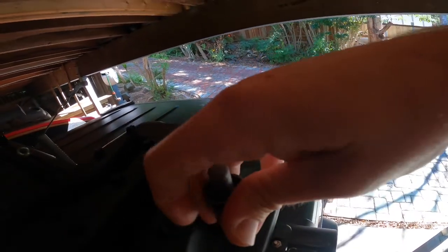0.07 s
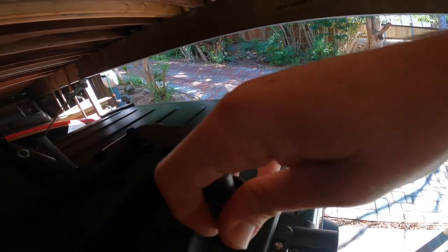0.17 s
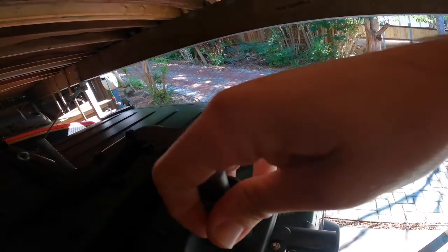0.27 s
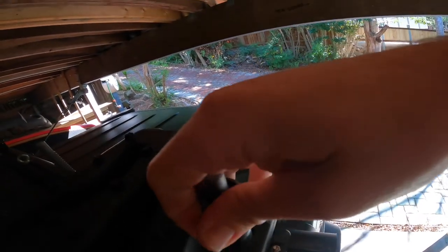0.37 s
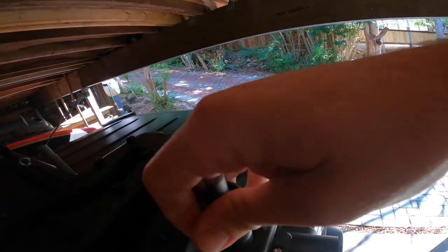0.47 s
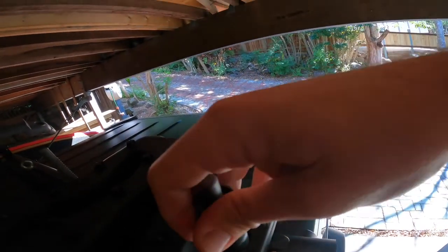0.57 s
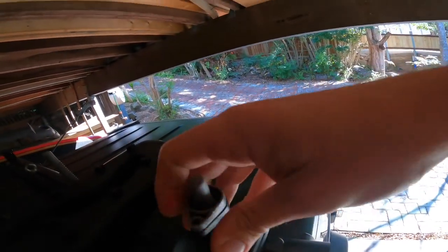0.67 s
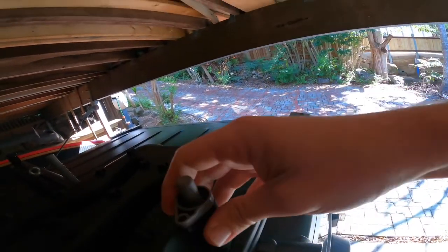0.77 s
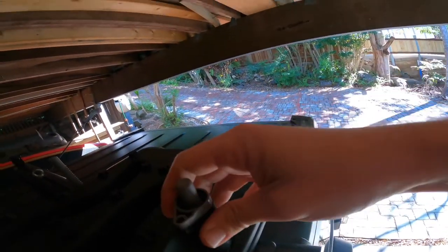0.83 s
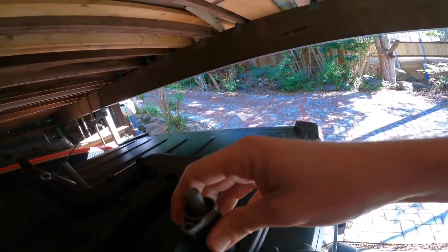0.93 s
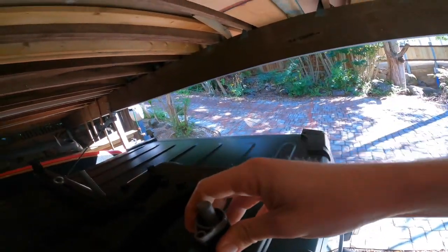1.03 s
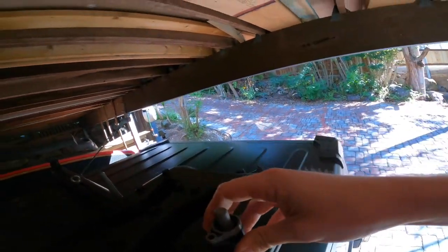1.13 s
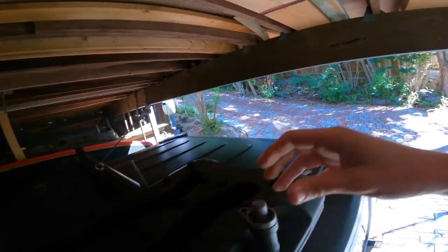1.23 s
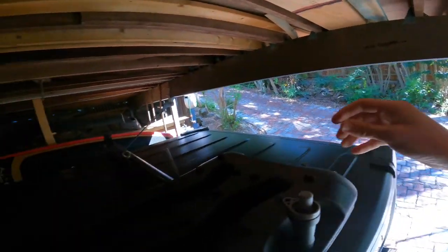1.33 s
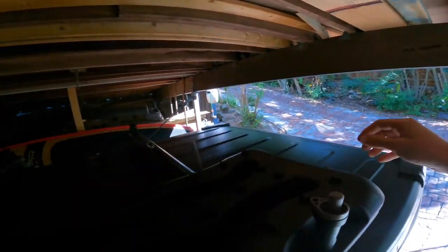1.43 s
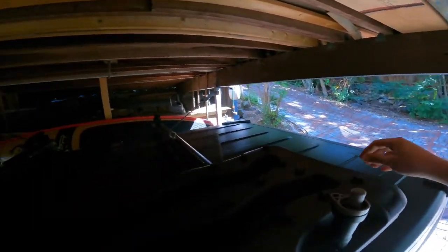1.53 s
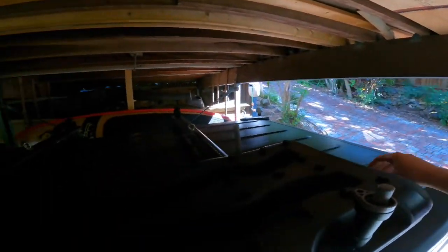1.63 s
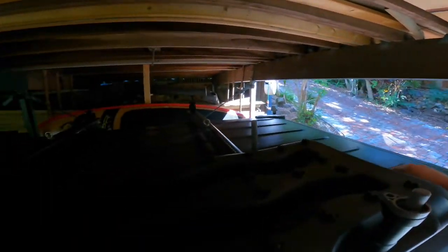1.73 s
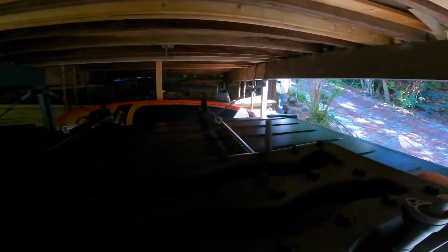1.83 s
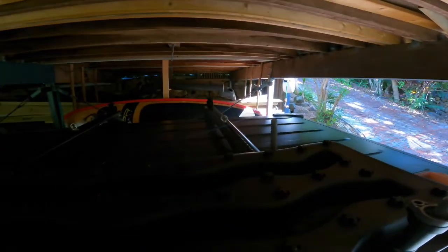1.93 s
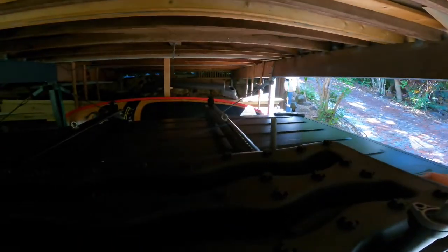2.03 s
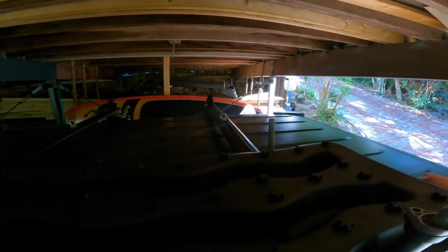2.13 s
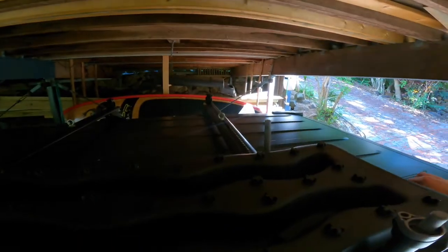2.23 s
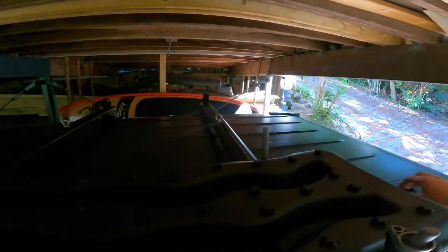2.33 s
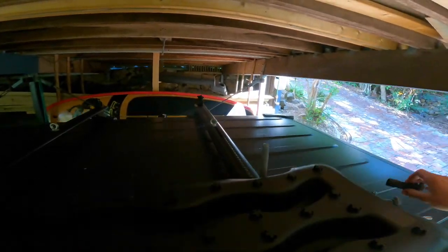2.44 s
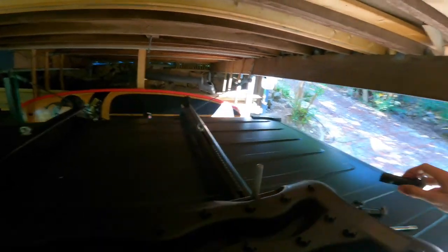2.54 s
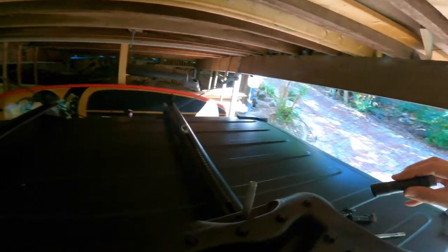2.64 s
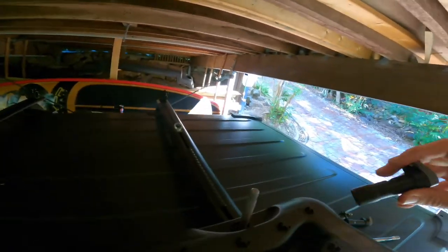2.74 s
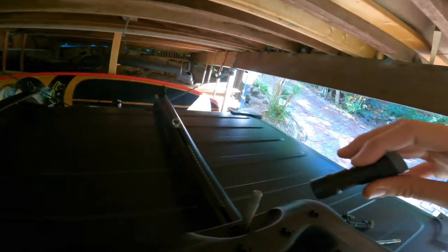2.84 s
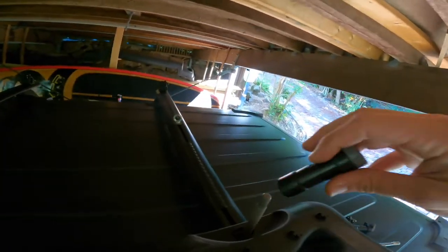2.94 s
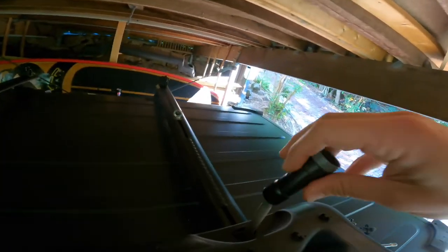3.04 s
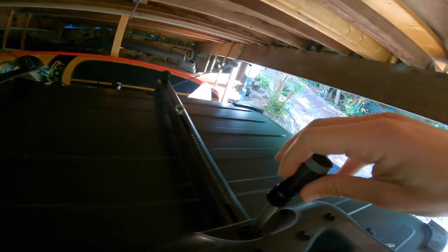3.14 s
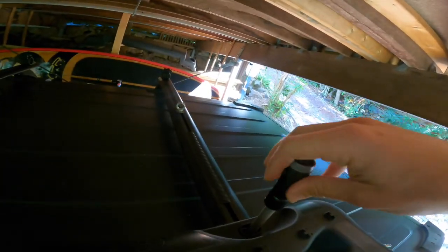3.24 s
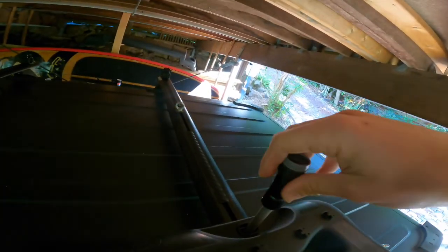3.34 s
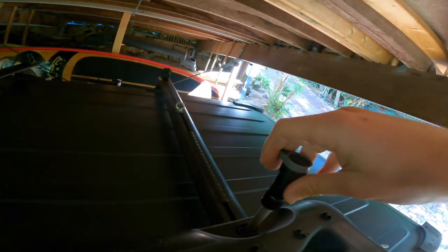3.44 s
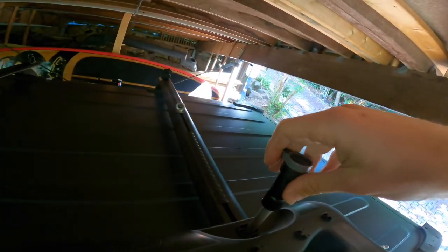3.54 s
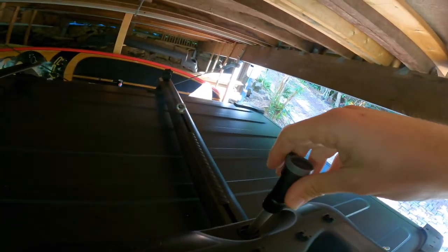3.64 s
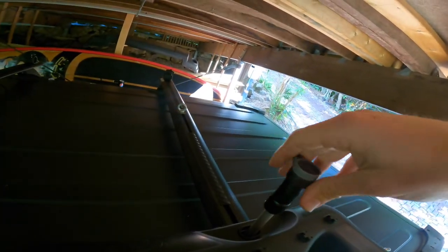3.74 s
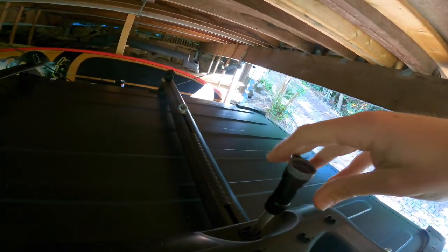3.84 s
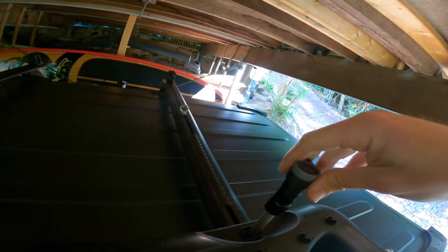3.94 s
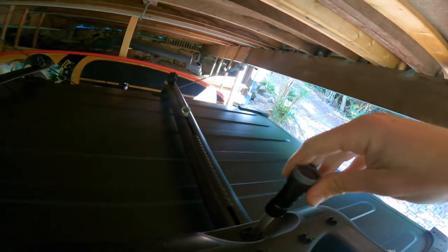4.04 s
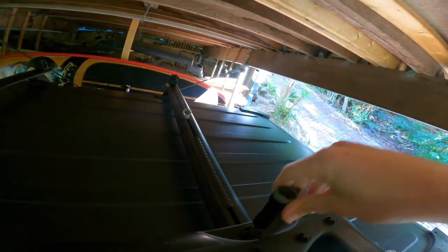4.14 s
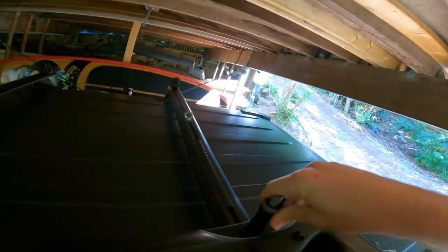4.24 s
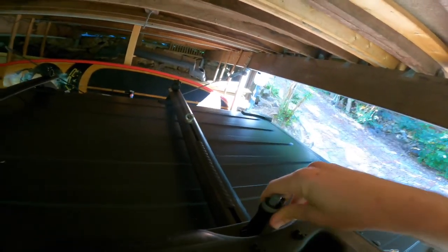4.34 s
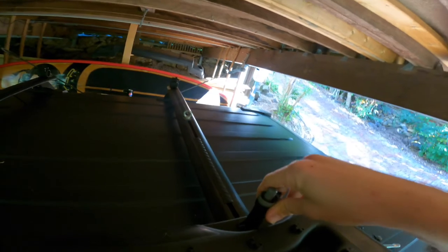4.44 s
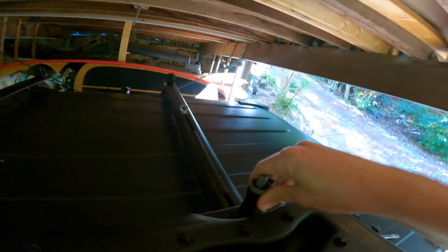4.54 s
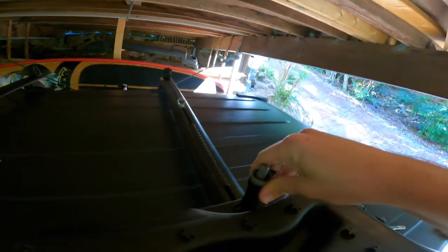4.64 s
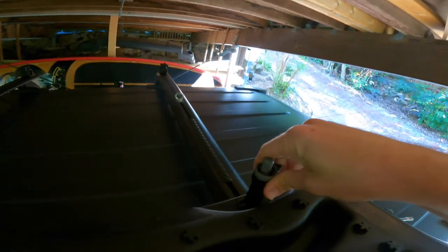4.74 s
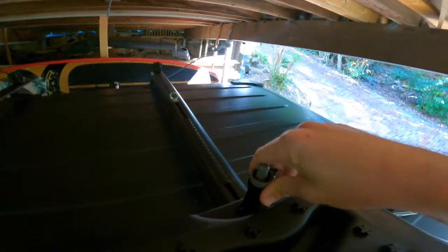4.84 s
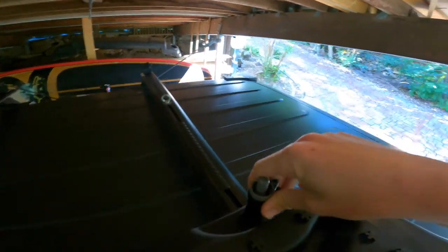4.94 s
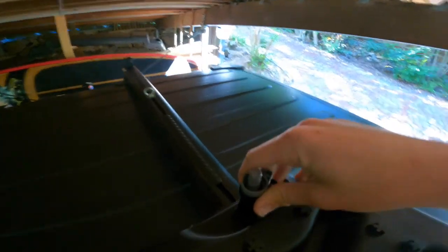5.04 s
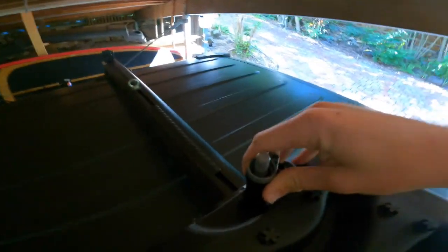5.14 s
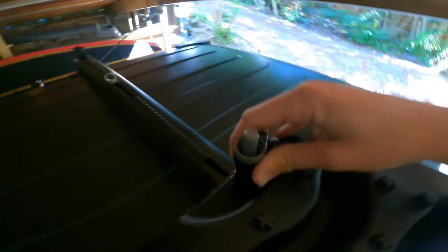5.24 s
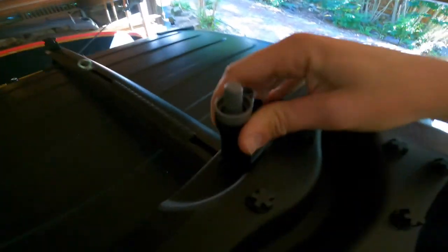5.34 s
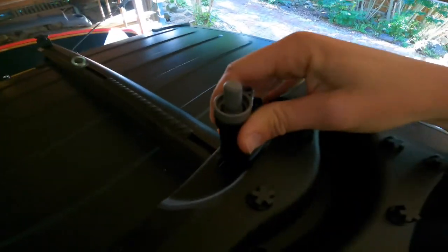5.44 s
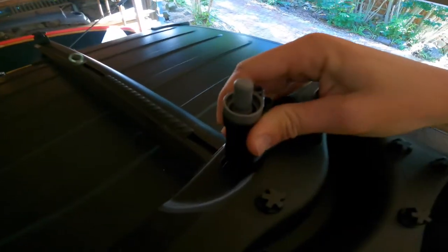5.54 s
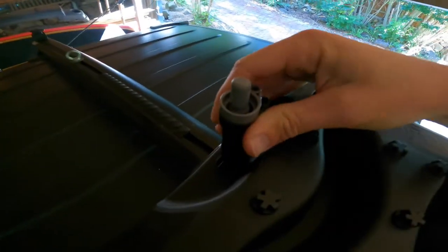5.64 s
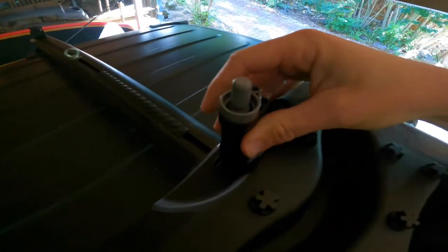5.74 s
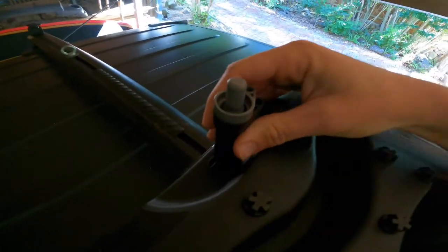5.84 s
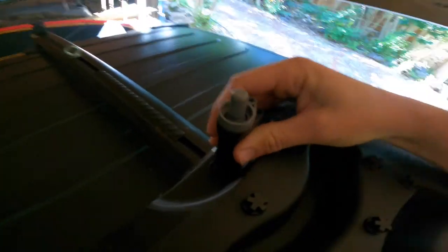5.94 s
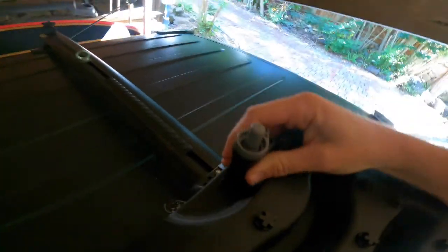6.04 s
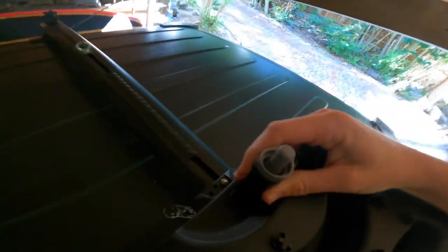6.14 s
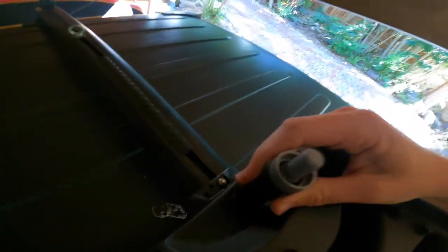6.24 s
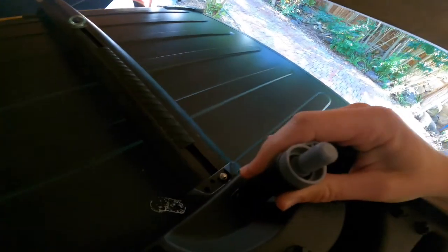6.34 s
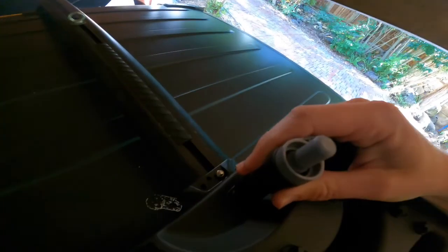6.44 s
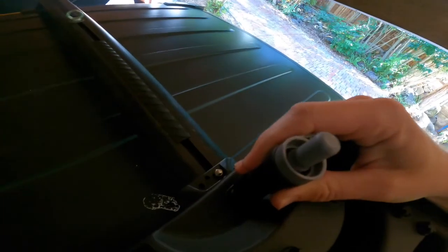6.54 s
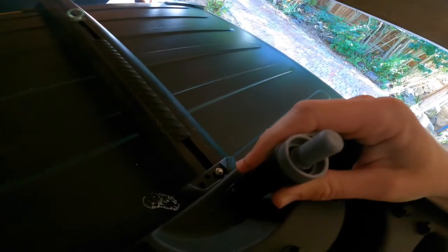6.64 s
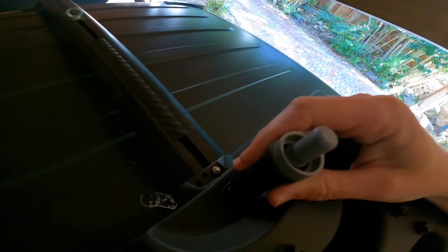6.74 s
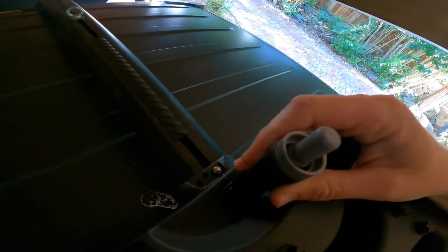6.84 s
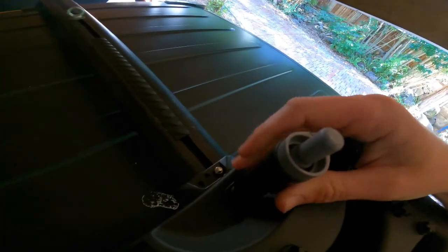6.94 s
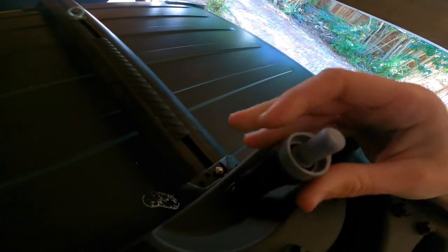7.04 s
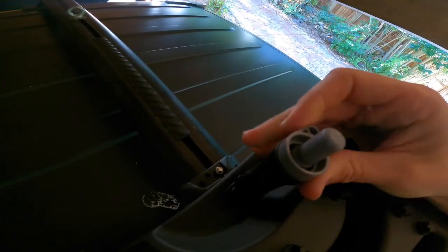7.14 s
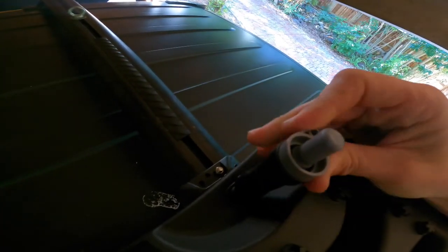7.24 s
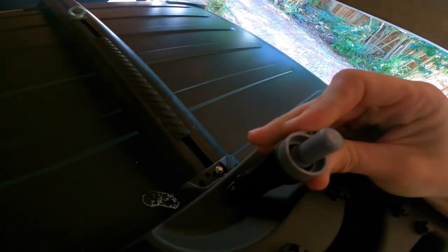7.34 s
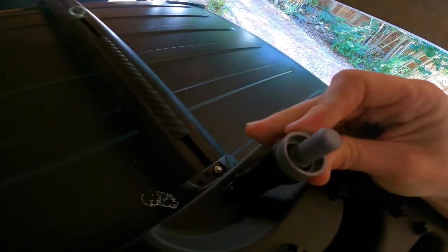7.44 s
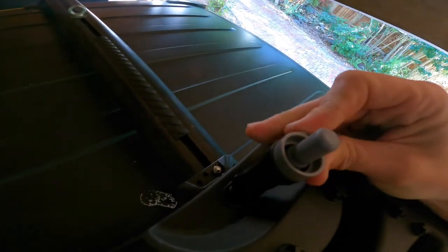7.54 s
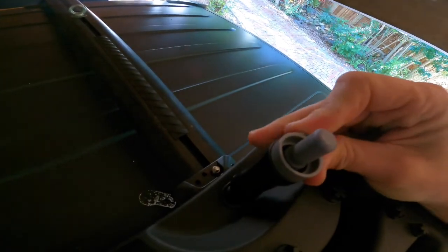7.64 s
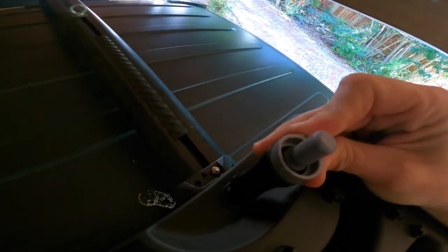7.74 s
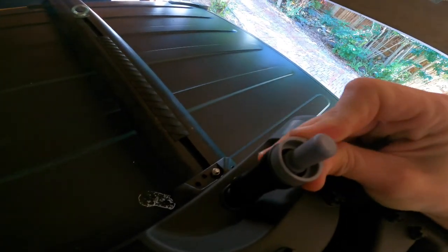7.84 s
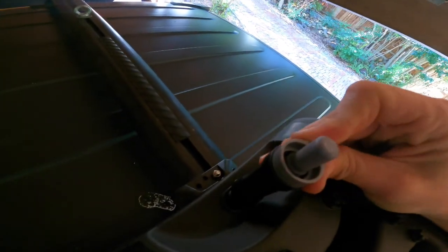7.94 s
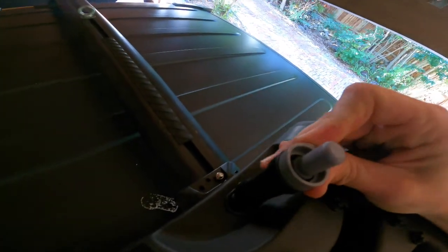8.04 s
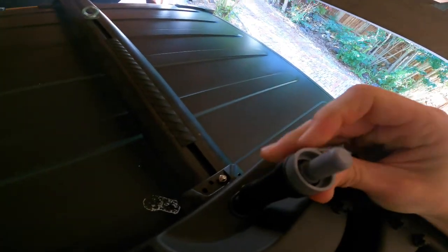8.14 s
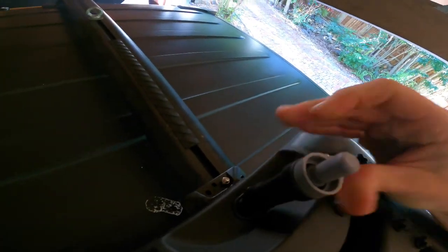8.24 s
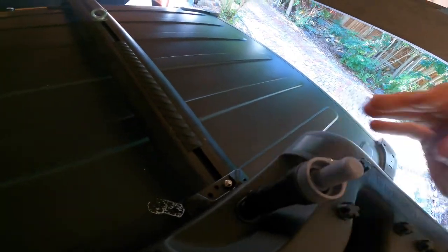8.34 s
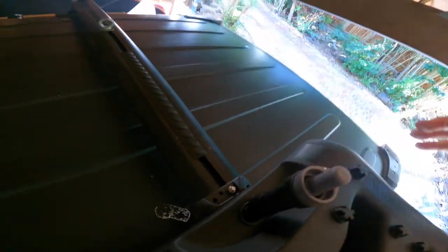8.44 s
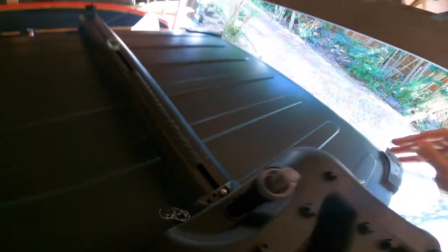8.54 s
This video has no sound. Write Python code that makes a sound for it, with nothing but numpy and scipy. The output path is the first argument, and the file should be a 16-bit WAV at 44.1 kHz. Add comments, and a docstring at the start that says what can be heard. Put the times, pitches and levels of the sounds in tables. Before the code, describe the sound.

Close hand work on a big plastic panel: small clicks, hollow thuds, a fast ribbed zip, then soft rubs and taps above distant engine hum.

```python
"""Plastic pins click and thump into a large moulded lid inside an open wooden shed, close to the microphone.
Each blow rings the lid in several bands, heavy ones also bend it; a ribbed pin ratchets down its hole.
Short creaks, rings and low thumps are swelling tones; rubbing fingers and plastic are uneven noise grains.
Behind them, air and traffic rumble as low noise and a far engine hums as two wavering tones.
The stereo picture closes almost to the middle around 3.5 s and opens partly at the very end."""
import sys
import numpy as np
from scipy import signal
from scipy.fft import rfft, irfft, next_fast_len
from scipy.io import wavfile

SR = 44100
rng = np.random.default_rng(int(sys.argv[2]) if len(sys.argv) > 2 else 0)


def bounce(signal):
    """Save signal as a 16-bit WAV file at the path given by the first command-line argument."""
    frames = np.transpose(np.atleast_2d(signal))
    limited = np.clip(frames, -1, 1)
    pcm = np.round(limited * 32767).astype(np.int16)
    wavfile.write(sys.argv[1], SR, pcm)


N = 379298

# ways the lid and pin ring, from low to high: (f/Hz, level/dB, time to fall 60 dB/s)
THUMP = [(67, -5.5, 0.19), (99, 1.5, 0.046), (169.3, -4, 0.1), (211.7, -3, 0.084), (279.6, -6, 0.027)]
BODY = [(334, -8, 0.16), (424, -8, 0.079), (443, 0.5, 0.025), (502, -5.5, 0.057), (548, -8.5, 0.053),
        (679, -3, 0.031), (779, -5, 0.05), (893, 0, 0.016)]
KNOCK = [(1026, -6, 0.058), (1166, -4.5, 0.033), (1327, -1.5, 0.021), (1576, -1, 0.016),
         (1724, -7.5, 0.055), (1876, -0.5, 0.017), (2153, -3.5, 0.017)]
CLICK = [(2390, -1, 0.0062), (3160, 6.5, 0.0023), (3780, -0.5, 0.0073), (4244, -0.5, .007),
         (4705, 8.5, 0.0022), (5354, 5, 0.003), (6500, -5.5, 0.0029), (7450, -6.5, 0.0037),
         (8850, -11.5, .004), (10050, -15.5, 0.0034), (12200, -21, 0.0028)]
# rumble of air and traffic: (t/s, level/dB)
RUMBLE = [(0.0, -36.5), (0.35, -45.5), (1.0, -40.5), (1.7, -43.5), (2.2, -39.5), (3.4, -40), (3.9, -40),
          (4.29, -39.5), (4.69, -45.5), (5.3, -41), (5.55, -44), (6.0, -40.5), (6.23, -36), (6.45, -38.5),
          (7.02, -41), (8.3, -37.5), (8.48, -40.5), (8.6, -34)]
# its tone colour: (f/Hz, level/dB)
RUMBLE_COLOUR = [(8.8, -33), (30, -7.5), (44, 5.5), (70, 0), (166, -7.5), (400, -22.5), (520, -48),
                 (880, -120)]

THUMP_COLOUR_HZ = 200
# the ribbed pin catches once, then its ribs run past the rim
CATCH_S, RUN_S = 4.141, 4.1696
RIB_CLICK_DB, RIB_BODY_DB = -20, -16.5


def amp(db):
    """Turn dB into a gain."""
    return 10 ** (np.asarray(db) / 20)


def rms_one(x):
    """Scale a signal to an rms of 1."""
    return x / np.sqrt(np.mean(x ** 2) + 1e-20)


def in_time(rows):
    """Turn table columns into curves with one value a sample."""
    s, *columns = np.transpose(rows)
    return [np.interp(np.arange(N) / SR, s, c) for c in columns]


def coloured(x, spectrum):
    """Filter a signal by a table of (f/Hz, level/dB), joined along a log pitch scale."""
    size = next_fast_len(N)
    hz, db = np.transpose(spectrum)
    log_hz = np.log(np.arange(size // 2 + 1) * SR / size + 1)
    gain = amp(np.interp(log_hz, np.log(hz), db))
    return irfft(rfft(x, size) * gain, size)[:N]


def drift(rate):
    """Wander randomly with rms 1, choosing about rate new values a second."""
    knots = int(N / SR * rate) + 2
    return rms_one(np.interp(np.linspace(0, knots - 1, N), np.arange(knots), rng.standard_normal(knots)))


def swell(start, end, level_db, rise_db, fall_db):
    """Level in dB that climbs to a hold and falls away, slopes in dB per second."""
    t = np.arange(N) / SR
    return level_db - rise_db * np.maximum(start - t, 0) - fall_db * np.maximum(t - end, 0)


def near(modes, colour_hz, db_per_octave):
    """The spot struck favours the modes near its colour."""
    return -db_per_octave * np.abs(np.log2(np.array(modes)[:, :1] / colour_hz))


def ringing(modes, extra_db=0, stretch=1):
    """Sum the fading tones after one click; neighbours start in opposite directions."""
    hz, db, t60 = np.array(modes).T[:, :, None]
    t = np.arange(SR // 4) / SR
    sign = (-1) ** np.arange(len(modes))[:, None]
    level = amp(db + extra_db - 60 * t / t60)
    return np.sum(sign * level * np.sin(2 * np.pi * hz * stretch * t), axis=0)


def strike(force, modes, peak_db, extra_db=0, soft_hz=20000, detune=.01):
    """A force, rounded by a soft contact, rings the modes a little differently each time."""
    chance = rng.standard_normal((2, len(modes), 1))
    ring = ringing(modes, extra_db + 2.0 * chance[0], 1 + detune * chance[1])
    r = np.exp(-2 * np.pi * soft_hz / SR)
    soft_force = signal.lfilter([1], [1, -2 * r, r * r], force)
    sound = signal.fftconvolve(soft_force, ring)[:len(ring)]
    return amp(peak_db) * sound / np.max(np.abs(sound))


def add(out, sound, s):
    """Mix a sound in at time s."""
    i = round(s * SR)
    out[i:i + len(sound)] += sound[:N - i]


def yard():
    """Air and traffic are lumpy low noise; the engine is a firing tone and one at half its pitch."""
    # deepest swell of the rumble: (t/s, level/dB)
    deep = [(0.0, -45), (0.12, -34), (0.17, -42.5), (3.83, -60), (4.0, -43), (4.31, -31), (4.58, -54.5),
            (5.01, -49.5), (5.41, -30.5), (5.46, -46.5), (8.46, -54.5), (8.6, -48)]
    # its tone colour: (f/Hz, level/dB)
    deep_colour = [(10, -31.5), (20, -0.5), (32, 0.5), (45, -24.5), (80, -88)]
    # far engine: (t/s, firing f/Hz, firing level/dB, half-pitch level/dB), before small wavers
    engine = [(0, 142.1, -57, -63), (.6, 142.2, -54, -52), (1.9, 139.9, -51.5, -47.5),
              (2.4, 140.6, -71.5, -55), (5.4, 146.2, -60.5, -69), (6.4, 151.2, -51.5, -103),
              (7, 149.3, -47.5, -45), (7.6, 150.5, -42.5, -48.5), (8.1, 156.1, -43, -38.5),
              (8.6, 161.2, -63.5, -48.5)]
    rumble = rms_one(coloured(rng.standard_normal(N), RUMBLE_COLOUR)) * amp(in_time(RUMBLE)[0])
    rumble = rumble + rms_one(coloured(rng.standard_normal(N), deep_colour)) * amp(in_time(deep)[0])
    hz, firing_db, half_db = in_time(engine)
    turn = np.cumsum(2 * np.pi * hz * (1 + .004 * drift(8)) / SR)
    wobble_db = 1.5 * drift(5)   # raises one tone while it lowers the other
    firing = amp(firing_db + wobble_db) * np.sin(turn)
    half = amp(half_db - wobble_db) * np.sin(turn / 2)
    return rumble + np.sqrt(2) * (firing + half)


def shed(x):
    """Diffuse echoes of the timber roof, a fading noise tail duller than the direct sound."""
    t60_s, first_echo_s = 0.3, .006
    t = np.arange(SR // 2) / SR
    tail = rng.standard_normal(len(t)) * amp(-60 * t / t60_s) * (t > first_echo_s)
    tail = signal.lfilter([1], [1, -.5], tail)
    return signal.fftconvolve(x, tail / np.linalg.norm(tail))[:N]


def rubbing():
    """Fingers and plastic rub as dense uneven grains; the dull part is partly heard through the lid."""
    # rubs: (start t/s, length/s, dull level/dB, bright level/dB), before the grip wavers
    rubs = [(0.0, 0.0027, -41.5, -46), (0.463, 0.021, -55.5, -58.5), (0.724, 0.079, -56, -57),
            (0.888, 0.2, -56.5, -68), (1.25, 0.059, -54, -50.5), (1.614, 0.28, -72, -65),
            (2.115, 0.16, -49, -71), (2.459, 0.4, -59.5, -64.5), (2.973, 0.039, -50.5, -76),
            (3.18, 0.15, -43.5, -56.5), (3.322, 0.12, -49, -63), (3.311, 0.098, -38, -60),
            (3.683, 0.092, -52.5, -57.5), (3.965, 0.049, -42.5, -58), (4.17, 0.21, -44.5, -65),
            (4.888, 0.027, -48, -70), (5.018, 0.1, -50.5, -64), (5.135, 0.037, -41, -64),
            (5.224, 0.04, -44, -64), (5.292, 0.029, -53, -63), (5.374, 0.063, -46, -80),
            (5.44, 0.03, -56, -75), (6.084, 0.034, -40.5, -59.5), (6.161, 0.068, -37.5, -62.5),
            (6.228, 0.018, -46, -68), (6.249, 0.039, -41, -60.5), (6.292, 0.017, -37.5, -70),
            (6.332, 0.014, -58, -67.5), (6.962, 0.19, -63, -65.5), (7.154, 0.062, -54, -69.5),
            (7.32, 0.039, -57, -67.5), (7.466, 0.049, -57.5, -70), (7.943, 0.11, -64, -73.5),
            (8.258, 0.11, -57, -63), (8.527, .05, -47, -65.5)]
    # air of the yard under them: (t/s, dull level/dB, bright level/dB), before the wavers
    air = [(0, -58, -57), (.3, -59, -69), (1.2, -57.5, -65.5), (2.0, -56.5, -70), (2.9, -59.5, -79.5),
           (3.55, -56.5, -74), (4.6, -61, -76), (5.6, -58, -72.5), (6.7, -57, -71.5), (7.4, -59.5, -79),
           (7.7, -61.5, -78), (8.0, -59, -73.5), (8.6, -55.5, -73.5)]
    # tone colours of the dull and the bright part: (f/Hz, level/dB)
    dull_colour = [(150, -34), (250, -8.5), (383, -7), (507, -0.5), (611, -8), (1230, -12), (2130, -23),
                   (3000, -24), (3900, -36.5), (6600, -120)]
    bright_colour = [(1180, -22), (2000, -3), (2540, -8), (2770, -8.5), (4070, -6), (6250, -13),
                     (6870, -14), (12200, -30.5), (15500, -53.5)]
    attack_db_per_s, release_db_per_s = 506.5, 257
    pressure_db = 2.5 * rms_one(drift(25) + 0.6 * drift(110))   # the grip wavers
    dull_level, bright_level = amp(in_time(air) + .4 * pressure_db)   # the air wavers less
    for s, length, dull_db, bright_db in rubs:
        shape = amp(swell(s, s + length, 1.3 * pressure_db, attack_db_per_s, release_db_per_s))
        dull_level = np.hypot(dull_level, amp(dull_db) * shape)
        bright_level = np.hypot(bright_level, amp(bright_db) * shape)
    grain_db = 3.0 * np.minimum(rng.exponential(1, (2, N)), 6)
    dull, bright = rng.standard_normal((2, N)) * amp(grain_db)
    lid = rms_one(signal.fftconvolve(dull, ringing(BODY + KNOCK))[:N])
    dull = rms_one(rms_one(coloured(dull, dull_colour)) + 0.04 * lid)
    return dull_level * dull + bright_level * rms_one(coloured(bright, bright_colour))


def tones():
    """Each creak, ring or low thump is a slightly unsteady tone that swells to its peak and fades."""
    # short tones: (peak t/s, f/Hz, peak level/dB, 60 dB rise/s, 60 dB fade/s)
    tone_rows = [(.063, 450, -33, 0.031, .04), (0.086, 449, -26, 0.069, 0.029),
                 (.119, 422, -27, 0.049, 0.031), (.148, 339, -33, 0.1, 0.076), (.09, 1260, -55, .03, 0.033),
                 (0.117, 1280, -50, .05, .04), (2.905, 1760, -28, 0.0065, 0.022),
                 (3.155, 1310, -15, 0.0043, 0.038), (3.16, 580, -23, 0.017, 0.041),
                 (3.189, 337, -21.5, 0.08, 0.12), (3.236, 2550, -46, .02, 0.027),
                 (3.175, 4200, -40, 0.027, 0.033), (2.142, 1170, -22, 0.058, 0.054),
                 (4.13, 2620, -23.5, .006, 0.11), (4.275, 1500, -20, 0.095, 0.11),
                 (4.3, 660, -16, 0.17, 0.044), (4.36, 1140, -36.5, 0.13, 0.041),
                 (4.401, 44.3, -24.5, 0.17, .2), (1.288, 2000, -26, 0.0051, 0.0081),
                 (6.145, 1880, -38, 0.044, .04), (3.406, 73, -17.5, .025, 0.036),
                 (5.36, 1767, -21, 0.036, 0.022), (5.362, 850, -31, 0.071, 0.014),
                 (6.2, 530, -27.5, 0.023, 0.071), (7.083, 1500, -35, 0.01, 0.018),
                 (8.048, 88, -24.5, 0.035, .04), (7.26, 1350, -51, .06, .04), (7.486, 1200, -43, .03, .03),
                 (7.063, 3500, -50, 0.0092, 0.022), (7.168, 1470, -41, 0.027, 0.024),
                 (7.169, 4050, -45, 0.035, 0.033), (8.265, 770, -34.5, 0.0097, 0.016),
                 (8.292, 2200, -46, 0.033, .015), (8.3, 4300, -46, 0.012, .02)]
    pitch_wobble = 0.0069   # share of the pitch
    out, lead = np.zeros(N), SR // 20
    t = (np.arange(3 * lead) - lead) / SR
    for s, hz, peak_db, rise, fade in tone_rows:
        wobble = np.interp(t, np.linspace(t[0], t[-1], 30), rng.standard_normal(30))
        turn = np.cumsum(2 * np.pi * hz * (1 + pitch_wobble * wobble) / SR)
        level = amp(peak_db + np.where(t < 0, 60 * t / rise, -60 * t / fade))
        add(out, -level * np.cos(turn - turn[lead]), s - lead / SR)
    return out


def slaps():
    """A heavy blow bends the lid: a short wave of falling pitch that dips first and swells."""
    # bends: (t/s, level/dB before swell and fade, settled f/Hz before a small random shift)
    slap_rows = [(2.916, -4, 164.5), (2.9242, -9, 120), (4.303, -13.5, 110), (4.613, -16, 144),
                 (5.1226, -4.5, 99), (5.2047, -6, 124), (5.2186, -11.5, 144), (5.2604, -18.5, 130),
                 (5.364, -11, 151), (6.0281, -6, 200), (6.258, -31, 152)]
    start_hz, soft_hz = 827, 1794   # the start shifts with the settled pitch
    swell_s, fall_s, t60_s = 0.0013, .0018, 0.071
    out, t = np.zeros(N), np.arange(SR // 10) / SR
    for s, level_db, end_hz in slap_rows:
        hz = end_hz + (start_hz - end_hz) * np.exp(-t / fall_s)
        turn = np.cumsum(2 * np.pi * hz * rng.uniform(.97, 1.03) / SR)
        level = amp(level_db - 60 * t / t60_s) * (1 - np.exp(-t / swell_s))
        add(out, -level * np.sin(turn), s)
    return signal.sosfilt(signal.butter(4, soft_hz, fs=SR, output="sos"), out + 1e-18)


def ribs(count):
    """Time the ribs as rows (t/s, click level/dB, body level/dB): the catch, then a quickening run."""
    first_gap_s, last_gap_s = .0137, .0057
    gap_closes, gap_uneven = .72, .06   # the excess gap is multiplied by gap_closes at each rib
    catch_under_db, spread_db = 5, 1.5
    chance = rng.standard_normal((count + 1, 3))
    gaps = last_gap_s + (first_gap_s - last_gap_s) * gap_closes ** np.arange(count - 1)
    s = np.r_[CATCH_S, RUN_S, RUN_S + np.cumsum(gaps) + gap_uneven * gaps * chance[2:, 0]]
    under_db = catch_under_db * (s == CATCH_S)
    click_db = RIB_CLICK_DB - under_db + spread_db * chance[:, 1]
    body_db = RIB_BODY_DB - under_db + spread_db * chance[:, 2]
    return zip(s, click_db, body_db)


def scrape(flare):
    """The shaft scrapes the rim on its way down: grainy noise, growing and flaring at every snap."""
    # tone colour of the scrape: (f/Hz, level/dB)
    scrape_colour = [(180, -28), (300, -1.5), (366, -12.5), (652, -8), (907, -21.5), (1460, -9.5),
                     (2360, -15), (5480, -13), (6790, -22), (11000, -27), (15500, -37.5)]
    start_s, end_s = 4.147, 4.292
    start_db, growth_db_per_s = -32, 26   # before the flares
    attack_db_per_s, release_db_per_s = 1198.5, 646
    grains = rng.standard_normal(N) * amp(0.56 * rng.exponential(1, N))
    pushed_s = np.clip(np.arange(N) / SR, start_s, end_s) - start_s
    level_db = swell(start_s, end_s, start_db + growth_db_per_s * pushed_s,
                     attack_db_per_s, release_db_per_s)
    return amp(level_db) * flare * rms_one(coloured(grains, scrape_colour))


def ratchet():
    """Each rib snaps past the rim, ringing the lid and the free end of the pin over a scrape."""
    # free end of the pin: (f/Hz, level/dB, time to fall 60 dB/s)
    pin = [(1050, -1, 0.017), (2550, 1.5, .009), (4550, 1.5, 0.007), (5180, 0, 0.015), (7770, -10, 0.015),
           (10500, -15.5, 0.0075)]
    # how fast each of those tones climbs as the pin sinks: one column (octaves per s)
    pin_climb = [5.5, 6.5, 0.44, .3, 1.3, 0.38]
    pin_db = -13
    thump_db, thump_loss_db_per_s = -19.5, 60   # the jolt weakens as the pin sinks
    colour_hz, colour_octaves_per_s = 250, 16   # the lid answers higher as the pin goes deeper
    lid = THUMP + BODY + KNOCK
    out, flare, t = np.zeros(N), np.ones(N), np.arange(SR // 20) / SR
    for s, click_db, body_db in ribs(count=17):
        force = 0.2 * rng.standard_normal(len(t)) * amp(-60 * t / 0.01)
        force[0] = 1
        since_catch = s - CATCH_S
        body_hz = colour_hz * 2 ** (colour_octaves_per_s * since_catch)
        jolt_db = body_db - RIB_BODY_DB + thump_db - thump_loss_db_per_s * since_catch
        add(out, strike(force, CLICK, click_db, near(CLICK, 5500, 13.0), detune=0.061), s)
        add(out, strike(force, lid, body_db, near(lid, body_hz, 2.4), soft_hz=2500), s)
        add(out, strike(force, THUMP, jolt_db, near(THUMP, THUMP_COLOUR_HZ, 5.1), soft_hz=700), s)
        sunk = np.array(pin)
        sunk[:, 0] *= 2 ** (np.array(pin_climb) * max(s - RUN_S, 0))
        add(out, strike(force, sunk, click_db - RIB_CLICK_DB + pin_db, detune=0.022), s)
        add(flare, 4 * amp(-60 * t / .011), s)
    return out + scrape(flare)


def blows():
    """A main hit with a fading rattle of contacts after it rings the lid and pin."""
    # blows: (t/s, body peak level/dB, thump peak level/dB, knock peak level/dB, click peak level/dB,
    #         colour of the spot struck f/Hz, 60 dB fade of the rattle/s, main hit over rattle level/dB)
    blow_rows = [(0.031, -53, -57, -55, -47, 400, 0.031, 6), (0.059, -51, -56, -46, -57, 431, 0.027, 13),
                 (0.067, -35, -53, -39, -50, 470, .06, 21), (0.079, -39.5, -50, -39, -40, 446, 0.13, 2),
                 (0.116, -42, -45, -44.5, -46, 420, .04, 4), (0.127, -41, -49, -52, -36.5, 398, 0.044, -8),
                 (0.142, -59, -45, -48, -42, 340, 0.081, 2), (0.224, -63, -37, -59, -42.5, 334, 0.05, -6),
                 (0.537, -58, -40.5, -46, -49, 331, .03, 14), (0.59, -57, -53, -53, -52, 382, 0.055, 1),
                 (0.641, -58, -48, -53, -40, 482, .05, 25), (0.713, -47, -54, -58, -36.5, 350, 0.055, 6),
                 (0.744, -39, -48, -39, -34, 340, 0.025, 12), (0.767, -44, -41, -38.5, -36, 501, 0.052, -6),
                 (0.918, -49, -56, -56, -44, 659, 0.045, 10), (1.129, -60, -48, -49, -45, 331, 0.067, -5),
                 (1.209, -56, -50, -40, -42, 484, 0.16, 16), (1.239, -55, -50, -48, -40, 428, .03, -3),
                 (1.247, -53, -44, -43, -26.5, 428, 0.056, -8),
                 (1.258, -33, -37, -36, -22, 372, 0.023, -7.5),
                 (1.2615, -29.5, -40, -43, -24, 394, 0.046, 6),
                 (1.27, -34.5, -36, -26, -21.5, 500, 0.049, 13),
                 (1.287, -35, -31.5, -32, -31, 347, 0.044, 10),
                 (1.299, -39, -42, -34, -35.5, 450, 0.044, 0), (1.309, -35.5, -35, -48, -44, 337, 0.21, -5),
                 (1.931, -36.5, -54, -47, -51, 780, 0.11, 10),
                 (1.993, -38.5, -41.5, -53, -65, 770, 0.13, 1),
                 (2.127, -19.5, -39, -18, -22.5, 947, 0.12, 8.5),
                 (2.224, -35, -45, -40, -40.5, 350, 0.065, 3.5),
                 (2.47, -68, -55, -64, -43.5, 351, 0.072, 2), (2.769, -62, -64, -39, -34, 406, 0.057, 13),
                 (2.902, -40, -26, -42, -29, 510, 0.023, 3),
                 (2.916, -14.5, -23, -22, -28.5, 331, 0.032, 7.5),
                 (2.995, -33.5, -25.5, -56, -57, 338, 0.19, -10),
                 (3.154, -20, -26.5, -18, -26.5, 650, 0.057, -1),
                 (3.168, -38, -24.5, -25, -26, 342, 0.06, 5), (3.185, -38, -29, -45, -34.5, 332, 0.073, 6),
                 (3.192, -40, -34, -43, -35, 332, 0.018, 20), (3.209, -40, -42, -49, -43, 332, .03, 15),
                 (3.299, -30, -39, -32, -38, 331, 0.09, -8), (3.315, -24, -27, -24.5, -29, 684, 0.065, -12),
                 (3.353, -27, -37, -31, -46, 363, 0.056, 9),
                 (3.378, -25, -27.5, -22, -25.5, 900, 0.11, -17),
                 (3.402, -31, -26.5, -38, -44, 484, 0.031, -1),
                 (3.436, -25, -34, -31.5, -35.5, 570, 0.21, 13.5),
                 (3.629, -41, -59, -39.5, -55, 350, 0.14, 9), (3.7, -25, -27, -22.5, -16, 444, 0.069, 2.5),
                 (3.971, -27, -25.5, -22, -26.5, 830, 0.049, 2),
                 (4.056, -35, -43, -34.5, -41, 345, 0.067, 12),
                 (4.297, -12, -21.5, -13, -17, 420, 0.04, 6.5),
                 (4.613, -28.5, -28, -44, -64, 481, 0.19, 10),
                 (4.684, -36.5, -36.5, -46.5, -52, 498, 0.095, 6.5),
                 (4.885, -31, -29.5, -51, -61.5, 333, 0.2, 6.5),
                 (5.123, -14, -15, -17.5, -24, 600, 0.03, 2.5), (5.147, -21, -13, -37, -49, 498, 0.065, 21),
                 (5.16, -23, -18.5, -40, -46, 603, 0.03, 3), (5.172, -25.5, -32, -41, -48, 804, 0.016, 5),
                 (5.204, -15.5, -28, -26.5, -36, 618, 0.056, -4),
                 (5.219, -35, -37, -30, -37, 700, 0.021, 7), (5.26, -36, -44, -32.5, -41, 346, 0.043, 6),
                 (5.332, -42, -43, -33, -40.5, 770, 0.08, -3),
                 (5.349, -40.5, -19, -41, -34.5, 805, 0.096, -16),
                 (5.365, -10, -19.5, -10.5, -21, 840, 0.0088, 3.5),
                 (5.501, -42, -34.5, -63, -67.5, 328, 0.06, 11.5),
                 (5.603, -41, -42.5, -43, -51, 590, 0.071, 6), (5.759, -43, -42.5, -52, -51, 344, 0.1, 0),
                 (5.878, -40.5, -39.5, -40.5, -47.5, 386, 0.14, 0),
                 (5.938, -44.5, -51, -38, -66, 550, 0.21, 19.5),
                 (6.016, -28, -19.5, -40, -46, 450, 0.04, 2), (6.029, -21, -25, -22, -30, 880, 0.022, 5),
                 (6.039, -14.5, -20, -41, -41.5, 442, 0.023, 9), (6.082, -50, -43, -45, -55, 600, 0.034, 7),
                 (6.108, -45, -31, -30, -32.5, 580, 0.19, -12), (6.134, -34, -43, -39, -43, 500, 0.083, 0),
                 (6.233, -31, -32, -45, -55, 600, .04, 2), (6.19, -30, -42, -38, -57, 520, 0.074, -1),
                 (6.308, -39, -36, -50, -53, 512, 0.05, 5), (6.319, -34.5, -34, -46, -54, 513, 0.045, 6),
                 (6.256, -31, -28, -52, -53, 537, 0.082, 20), (6.436, -36, -44, -51.5, -71, 565, 0.16, -5),
                 (6.985, -57, -41.5, -57, -45.5, 650, 0.14, 5),
                 (7.036, -41.5, -40, -44.5, -47.5, 340, 0.24, -7), (7.062, -55, -47, -47, -46, 400, .03, 3),
                 (7.079, -37, -39, -35.5, -43, 460, 0.018, 8), (7.113, -42, -53, -44.5, -49, 360, 0.073, 3),
                 (7.156, -42, -46, -36, -37.5, 400, 0.12, -11),
                 (7.172, -35.5, -42, -36, -38, 400, 0.055, -2),
                 (7.473, -42.5, -38, -39, -41.5, 379, 0.06, 3),
                 (7.505, -48, -33, -55, -53.5, 334, 0.028, 7.5), (7.52, -55, -37.5, -58, -52, 329, .03, 11),
                 (7.54, -39, -43, -58, -53, 331, 0.044, 12), (7.883, -45, -42, -42.5, -39, 708.6, 0.11, 9),
                 (7.96, -60, -43, -57, -53, 330, 0.028, 14), (8.007, -49, -34, -48, -45, 331, 0.12, 11),
                 (8.041, -37.5, -34, -43, -44.5, 364, 0.097, 5),
                 (8.193, -48, -34.5, -68, -49, 331, 0.041, 7.5),
                 (8.261, -37, -35, -33, -39, 331, 0.076, 18.5),
                 (8.285, -48, -50, -42.5, -46.5, 400, .04, 3), (8.299, -45, -31, -51, -36.5, 375, 0.11, 9),
                 (8.588, -30, -27, -34.5, -38, 531, 0.08, -11)]
    rise_t60_s, rise_end_db = .03, -12   # short faint noise rising into each hit
    out, before = np.zeros(N), SR // 40
    t = (np.arange(SR // 5) - before) / SR
    for s, body_db, thump_db, knock_db, click_db, body_hz, rattle, hit_db in blow_rows:
        start = s - before / SR
        contacts = rng.standard_normal(len(t)) * (rng.random(len(t)) < .08)
        rise_db = rise_end_db + 60 * t / rise_t60_s
        rattle_db = -60 * t / max(rattle, .003)
        force = contacts * amp(np.where(t < 0, rise_db, rattle_db))
        force[before] = amp(hit_db)
        add(out, strike(force, BODY, body_db, near(BODY, body_hz, 8.1), soft_hz=1500), start)
        add(out, strike(force, THUMP, thump_db, near(THUMP, THUMP_COLOUR_HZ, 4.2), soft_hz=600), start)
        add(out, strike(force, KNOCK, knock_db, near(KNOCK, 1180, 10.0), soft_hz=4040), start)
        force[before] *= 2   # the treble hears mostly the hard edge of the main hit
        dullness = 1.5 * max(knock_db - click_db, 0)   # dB per octave away from 2000 Hz
        add(out, strike(force, CLICK, click_db, near(CLICK, 2000, dullness), detune=.025), start)
    return out


def scene():
    """Everything reaches both capsules alike, save a little of the rumble."""
    shed_db, apart_db = -20, -22
    hits = blows() + ratchet() + slaps() + tones()
    mid = hits + amp(shed_db) * shed(hits) + rubbing() + yard()
    apart = rms_one(coloured(rng.standard_normal(N), RUMBLE_COLOUR))
    apart = apart * amp(in_time(RUMBLE)[0] + apart_db)
    return np.array([mid + apart, mid - apart])


def record(dry):
    """Left and right differ by a scattered copy, a small lean and a bass lag; the top is cut."""
    # stereo picture: (t/s, width level/dB, left over right level/dB, left lags/ms)
    width = [(0, 3, .8, .02), (2.4, 6.5, 0.3, .02), (2.89, 6, 0, .03), (2.91, 9, -1.2, .45),
             (2.97, 8, -1, .4), (3.1, 2, .4, .02), (3.44, -9, 0, 0), (3.5, -30, 0, 0), (3.8, -52.5, 0, 0),
             (8.45, -55, 0, 0), (8.6, -10, 0, 0)]
    # colour of the side signal that follows the width: (f/Hz, level/dB before the width)
    wide = [(60, -46), (110, -28), (200, -24.5), (380, -18), (700, -13), (1290, -13.5), (2380, -11),
            (4400, -13), (8120, -14), (15000, -9)]
    # colour of the side signal that always stays: (f/Hz, level/dB)
    narrow = [(60, -91), (3000, -60.5), (4500, -27.5), (9000, -18.5), (11500, -8.5), (15000, -1)]
    lag_below_hz, cutoff_hz = 1000, 16050
    mid, t = dry.mean(axis=0), np.arange(SR // 4) / SR
    width_db, lean_db, lag_ms = in_time(width)
    scatter = rng.standard_normal(len(t)) * amp(-60 * t / 0.11)
    scattered = signal.fftconvolve(mid, scatter / np.linalg.norm(scatter))[:N]
    side = amp(width_db) * (coloured(scattered, wide) + (dry[0] - dry[1]) / 2)
    side = side + coloured(scattered, narrow)
    bass = coloured(mid, [(lag_below_hz, 0), (4 * lag_below_hz, -40)])
    side = side - lag_ms * SR / 2000 * np.gradient(bass)   # the slope of a wave stands in for a tiny delay
    left = (mid + side) * amp(lean_db / 2)
    right = (mid - side) * amp(-lean_db / 2)
    cut = signal.cheby2(12, 60, cutoff_hz, fs=SR, output="sos")
    return signal.sosfilt(cut, np.array([left, right]))


dry = scene()
out = record(dry)
bounce(out)
```